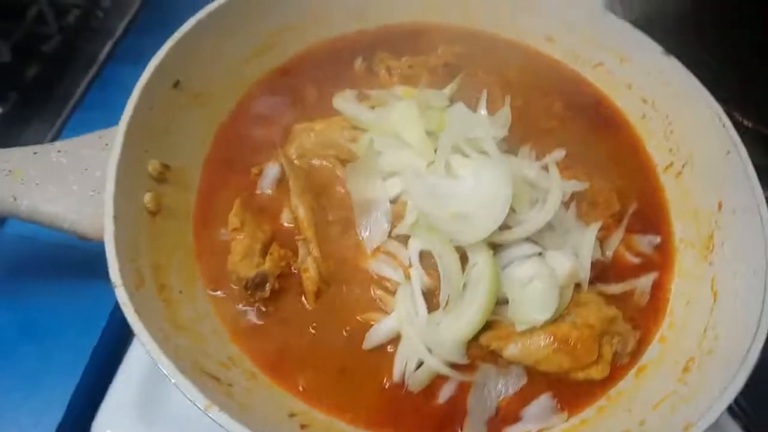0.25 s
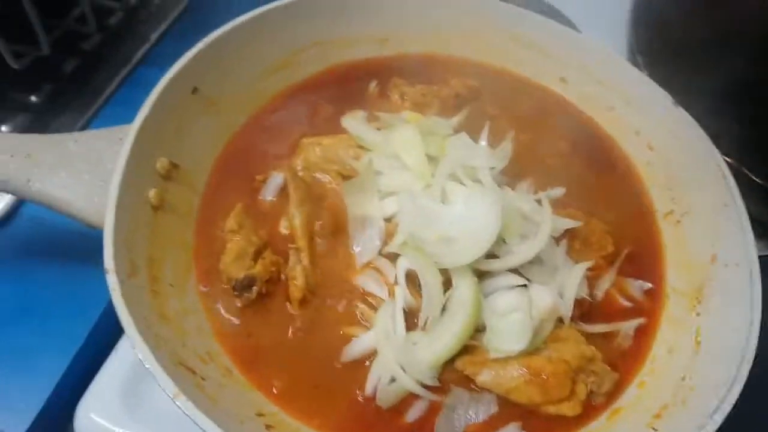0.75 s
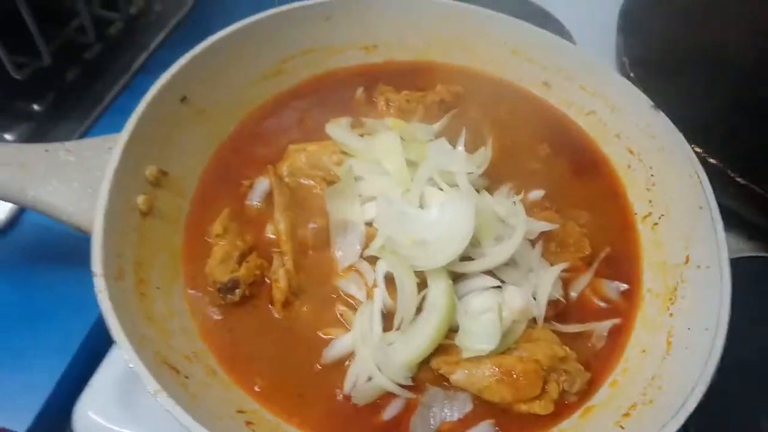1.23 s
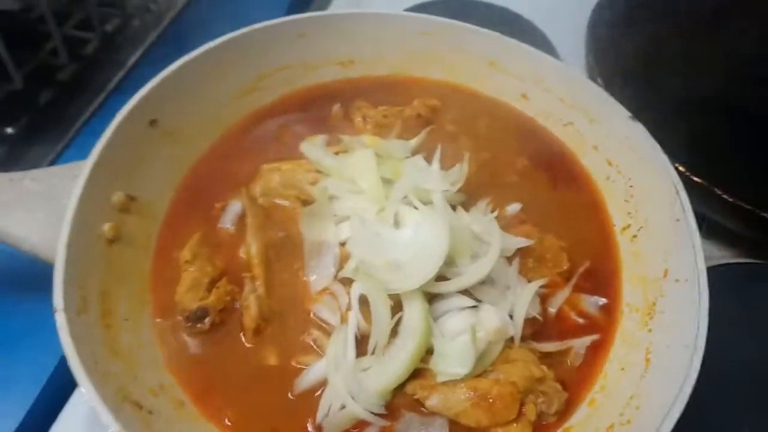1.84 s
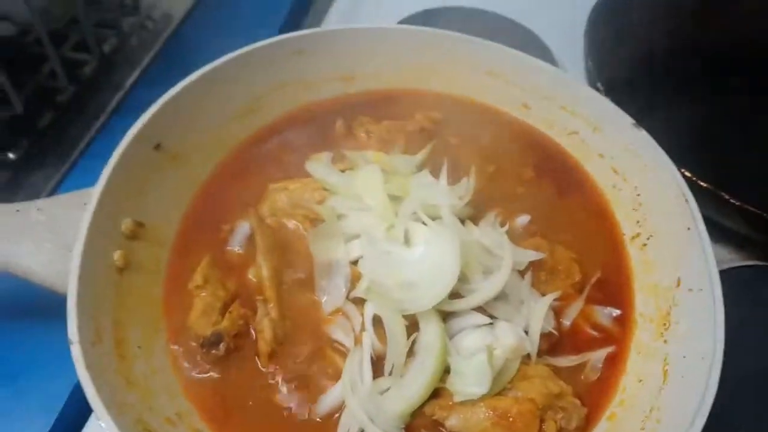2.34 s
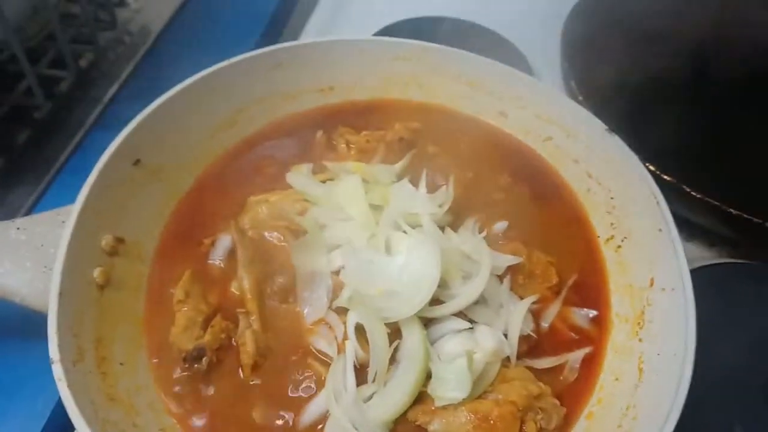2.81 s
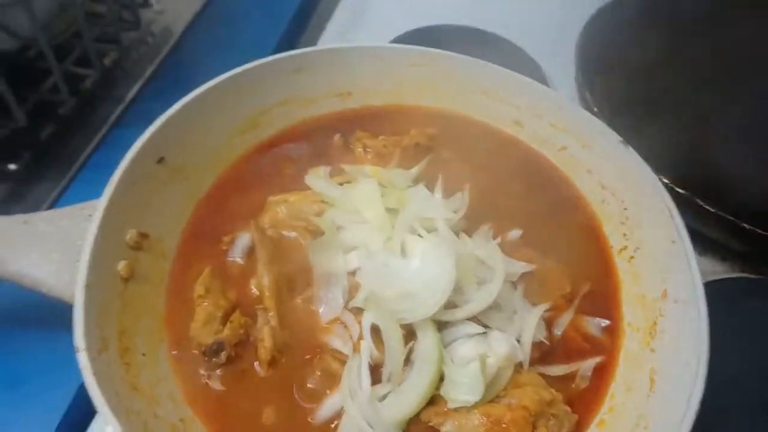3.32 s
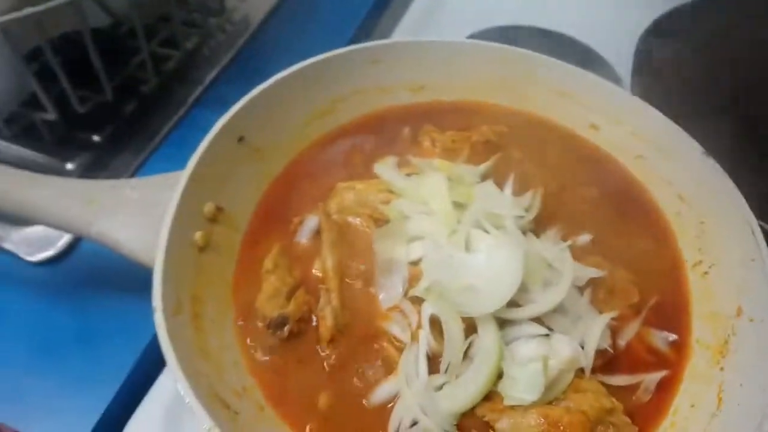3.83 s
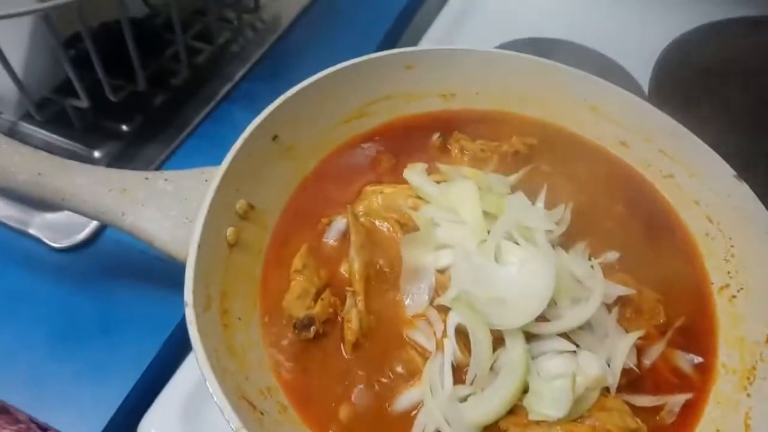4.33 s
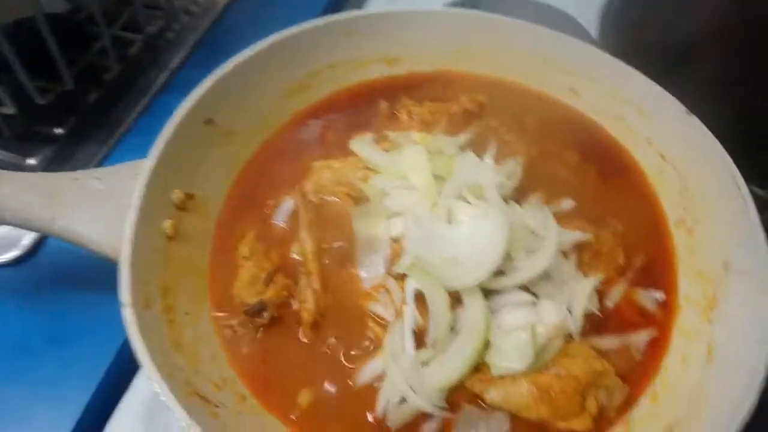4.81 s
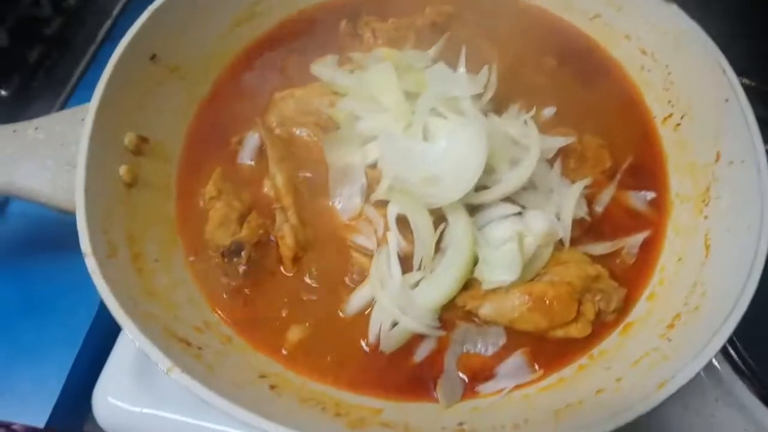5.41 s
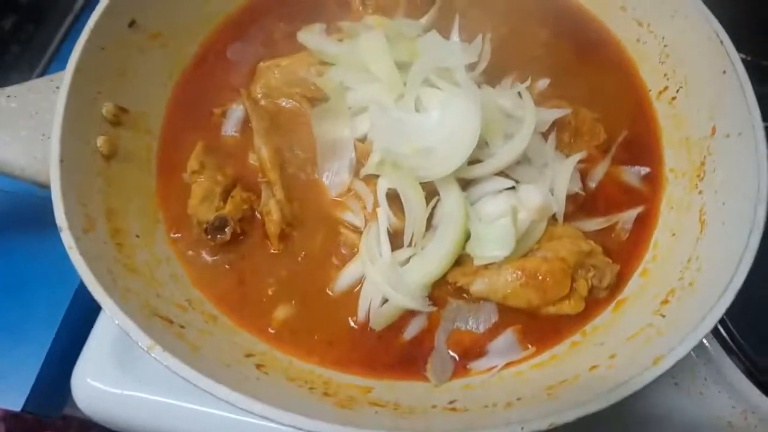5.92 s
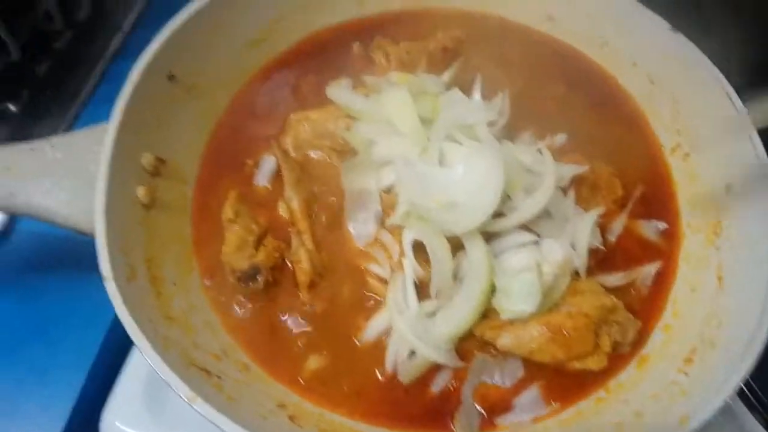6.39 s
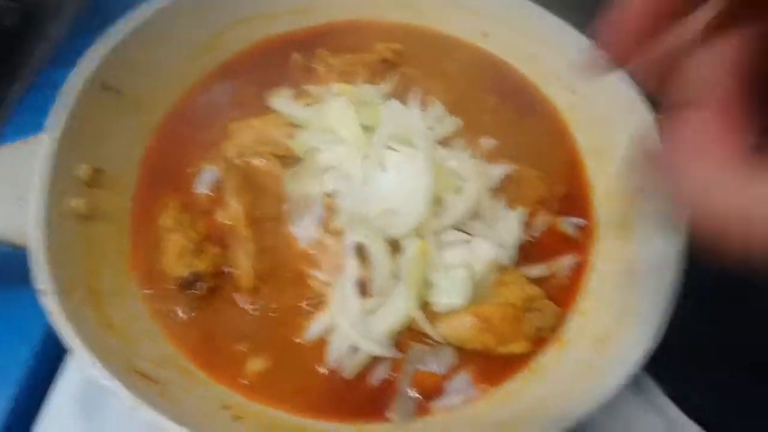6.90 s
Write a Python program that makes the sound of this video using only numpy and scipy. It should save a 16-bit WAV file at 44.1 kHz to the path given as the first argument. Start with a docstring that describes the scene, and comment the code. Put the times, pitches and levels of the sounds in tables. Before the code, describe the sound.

Throughout about seven seconds, thick sauce simmers in a pan close to the microphone. Tiny bubbles tick and fizz; larger ones pop and plop with short, upward-bending tones and quick echoes from the pan wall. Beside the stove, a soft set-down comes at 0.1, a faint china clink at 0.6 and a clearer one at 0.93. From 1.25 a drawer whirrs on its rollers, hits its stop at 1.33 and rattles in shrinking knocks until 1.62, with another light clink near 1.59. A dish gives a brief, rough low scrape at 2.3, then the drawer shifts faintly at 2.5. Soft thuds and a bright china clink fall around 3.1. At 3.6 the drawer bumps firmly and rolls until about 4.05. Bubbling then dominates, with strong pops near 5.0 and the loudest at 6.4. Low room rumble and thin hiss lie underneath.

```python
"""Curry simmering in a home kitchen

Close to the microphone, bubbles burst on thick sauce in a pan: short tones that rise in pitch, small ones
ticking and fizzing, large ones plopping. Further off beside the stove a china dish is clinked and nudged on
the worktop, its ring a sum of dying modes. A drawer of whirring noise bands runs on its rollers, bumps and
rattles to rest, and later rolls again. Faint narrow-band tones come from lightly tapped china and the ringing
drawer, and the room rumbles under a thin hiss."""
import sys
import numpy as np
from scipy import signal
from scipy.fft import rfft, irfft, next_fast_len
from scipy.io import wavfile

SR = 44100
rng = np.random.default_rng(int(sys.argv[2]) if len(sys.argv) > 2 else 0)


def materialize(psi):
    """Save the field psi as 16-bit PCM at rate SR to the path in sys.argv[1].

    A 1-D psi becomes a single channel; in a 2-D psi each row is a channel.
    """
    bounded = np.clip(np.atleast_2d(psi).T, -1, 1)
    quanta = np.round(bounded * 32767).astype(np.int16)
    wavfile.write(sys.argv[1], SR, quanta)


N = 315315
TIME = np.arange(N) / SR   # seconds


def from_db(db):
    """Decibels to gain."""
    return 10 ** (np.asarray(db) / 20)


def rms_one(x):
    """Scale to rms 1."""
    return x / np.sqrt(np.mean(x ** 2) + 1e-20)


def add(out, s, sound):
    """Mix a sound in at time s."""
    start = max(0, round(s * SR))
    out[start:start + len(sound)] += sound[:max(0, N - start)]


def filtered(x, hz, kind, order=2):
    """Butterworth filter."""
    edges = np.clip(hz, 10, .45 * SR)
    sos = signal.butter(order, edges, kind, fs=SR, output="sos")
    return signal.sosfilt(sos, x + 1e-18)


def noise_band(count, centre_hz, width_hz):
    """Narrow band of noise; rms 1."""
    edges = [centre_hz - width_hz / 2, centre_hz + width_hz / 2]
    return rms_one(filtered(rng.standard_normal(count), edges, "band"))


def coloured(x, spectrum):
    """Give a steady signal a spectrum; rms 1."""
    hz, db = np.transpose(spectrum)
    size = next_fast_len(len(x))
    bins = np.maximum(np.fft.rfftfreq(size, 1 / SR), 1)
    gain = from_db(np.interp(np.log(bins), np.log(hz), db))
    return rms_one(irfft(rfft(x, size) * gain, size)[:len(x)])


def wander(hz):
    """Random drift up to a given rate; spread 1."""
    return rms_one(filtered(rng.standard_normal(N), hz, "low"))


def dying(t, t60):
    """Envelope that falls 60 dB in t60."""
    return np.exp(-np.log(1000) * t / np.maximum(t60, 1e-4))


def swelling(t, rise_s):
    """Envelope of a blow spreading through a body."""
    return 1 - np.exp(-(t / rise_s) ** 2)


def reflections(x, t60, gap_s, low_hz, high_hz):
    """Diffuse echoes: a dying noise tail of unit energy that begins after a short gap."""
    t = TIME[:SR * 3 // 4]
    tail = filtered(rng.standard_normal(len(t)), [low_hz, high_hz], "band", order=1)
    tail = tail * dying(t, t60) * (t > gap_s)
    return signal.fftconvolve(x, tail / np.sqrt(np.sum(tail ** 2)))[:N]


# The kitchen's steady tone. Each row: frequency in Hz, relative density in dB per Hz.
ROOM_SPECTRUM = [(20, -5.5), (42, -11.5), (68, 7), (92, -3.5), (122, 8.5), (180, -34), (310, 1), (440, -15),
                 (770, -3), (1050, -14.5), (2500, -21.5), (6300, -28.5), (9000, -48), (14000, -51)]
ROOM_TONE_DB, HIGH_HISS_DB = -59, -81.5   # rms


def background():
    """Low room noise and a thin, very high hiss."""
    room = from_db(ROOM_TONE_DB) * coloured(rng.standard_normal(N), ROOM_SPECTRUM)
    hiss = filtered(rng.standard_normal(N), [14900, 15900], "band")
    return room + from_db(HIGH_HISS_DB) * rms_one(hiss)


# Bubbles too small to hear singly, close over the pan. Each row: frequency in Hz, relative density in dB per Hz.
SIZZLE_SPECTRUM = [(1200, -35), (2500, -10.5), (4500, 1.5), (6500, -3), (9000, -22), (14000, -22.5)]
SIZZLE_DB, SIZZLE_FLICKER_DB, SIZZLE_FLICKER_HZ = -74, 3, 8.9


def sizzle():
    """The finest fizz is noise that comes and goes in small surges."""
    level = from_db(SIZZLE_DB + SIZZLE_FLICKER_DB * wander(SIZZLE_FLICKER_HZ))
    return level * coloured(rng.standard_normal(N), SIZZLE_SPECTRUM)


def burst(hz, cycles, rise, opening=2.33):
    """A bubble's cavity rings a few cycles, rising in pitch as its film opens; peak 1."""
    t60 = cycles / hz
    t = TIME[:int(1.5 * t60 * SR) + 2]
    turns = hz * t * (1 + rise * (t / t60 - .5))
    onset = (1 - np.exp(-(opening * hz * t) ** 2)) ** 2
    wave = np.sin(2 * np.pi * turns) * dying(t, t60) * onset
    return wave / np.max(np.abs(wave))


def wall_echo(wave, nearest_s=0.000905, farthest_s=0.00325, echo_db=-11):
    """The pan's wall returns a burst after a random lag that stands for the bubble's place."""
    lag = int(SR * (nearest_s + abs(farthest_s - nearest_s) * rng.random() ** 2))
    return np.pad(wave, (0, lag)) + from_db(echo_db) * np.pad(wave, (lag, 0))


# The loudest bubbles in the pan, close to the microphone.
# Each row: start in seconds, peak level in dB before echoes, nominal pitch in Hz, cycles of ring in a 60 dB
# fall, after-ring in dB relative to the peak before after_db is added.
LOUD_BUBBLES = [(0.0048, -34.5, 760, 7.6, -20), (0.0148, -40, 800, 8.8, -24), (0.052, -38, 6880, 22, -37.5),
                (0.1526, -34, 2060, 3, -26), (0.1633, -32.5, 2500, 5.6, -21), (0.2021, -38.5, 775, 22, -28),
                (0.2787, -43, 6600, 32, -26), (0.33, -46, 9450, 21, -26), (0.398, -34.5, 1330, 10, -27),
                (0.4055, -41, 1450, 20, -32), (0.4828, -36, 1660, 21, -29), (0.5204, -35, 2330, 7.1, -23),
                (0.5626, -42, 4430, 20, -23), (0.6744, -41.5, 770, 13, -28),
                (0.6917, -38.5, 1530, 8.6, -28), (0.7218, -36, 2140, 15, -33), (1.2108, -36, 1680, 10, -33),
                (1.2344, -42.5, 805, 19, -13), (1.7178, -30.5, 1790, 4.9, -33),
                (1.727, -40.5, 905, 19, -41), (1.738, -44, 1540, 11, -28), (1.7584, -39, 1760, 10, -26),
                (1.7678, -35, 2020, 5.9, -28), (1.7937, -36, 1150, 3.4, -24),
                (1.8411, -30.5, 1676, 5.3, -16), (1.901, -31.5, 880, 1.5, -26),
                (2.0522, -32.5, 1980, 6.6, -24), (2.0873, -41, 1540, 7.4, -31),
                (2.181, -38, 4670, 9.3, -28), (2.422, -36, 2280, 12, -34), (2.4328, -38, 4370, 12, -30),
                (2.5632, -31, 2360, 8.3, -19), (2.629, -37.5, 4500, 15, -25), (2.6966, -33, 1750, 11, -42),
                (2.888, -43.5, 6790, 35, -18), (3.0305, -35.5, 4130, 8.3, -21),
                (3.3105, -36.5, 1650, 8.3, -30), (3.3324, -33, 850, 4.1, -25), (3.3365, -42, 6600, 32, -25),
                (3.411, -34.5, 1120, 8.6, -32), (3.4481, -35.5, 1460, 5.2, -23),
                (3.5106, -36.5, 1960, 13, -23), (3.5275, -36, 2030, 13.4, -36),
                (4.0578, -28.5, 1770, 6.7, -34), (4.1073, -33.5, 1320, 12, -36.5),
                (4.1324, -37.5, 764, 13, -29), (4.271, -40, 2140, 10, -22), (4.2835, -38.5, 2340, 12, -24),
                (4.3096, -35, 1620, 6, -34), (4.3477, -38, 1360, 10, -22), (4.3633, -35.5, 1210, 9.1, -30),
                (4.422, -28, 1690, 8.6, -32), (4.5136, -32, 1173, 8.3, -10), (4.5545, -36.5, 1410, 7, -24),
                (4.7068, -37.5, 730, 10, -23), (4.7463, -31, 1180, 5.5, -30), (4.7527, -41, 1470, 9, -30),
                (4.831, -38.5, 1830, 8, -31), (4.8491, -34, 800, 5.9, -32), (4.912, -50, 7200, 53, -30),
                (4.9755, -33, 1590, 14, -28), (4.9856, -25.5, 2410, 10.5, -13.5),
                (5.101, -33, 2240, 8.8, -24), (5.1043, -30, 1550, 3.6, -24), (5.118, -32.5, 1520, 10, -30),
                (5.211, -38.5, 6400, 12, -19), (5.2748, -33, 1320, 8.4, -21),
                (5.2995, -28.5, 1770, 3.8, -30), (5.3222, -40, 5200, 18, -18),
                (5.4912, -32.5, 4430, 6.5, -28), (5.5048, -38, 4470, 17, -28),
                (5.5234, -30.5, 2160, 7.6, -27), (5.5962, -37, 1840, 9.3, -26),
                (5.6113, -36.5, 1790, 11, -30), (5.6395, -38, 5460, 16, -28), (5.8474, -32, 2900, 24, -19),
                (5.8492, -31, 2900, 13, -34), (5.9405, -38.5, 810, 13, -30), (6.001, -37.5, 4500, 12, -24),
                (6.0575, -33, 1780, 3.8, -34), (6.271, -43, 12500, 2.8, -30), (6.3554, -43, 6800, 36, -32),
                (6.3875, -26.5, 2040, 6.2, -29), (6.4287, -19, 2384, 3.8, -16),
                (6.4348, -31.5, 2345, 69, -18), (6.4596, -35.5, 764, 12, -34),
                (6.522, -40.5, 1560, 7.5, -23), (6.6235, -32.5, 2250, 14, -18),
                (6.6365, -44, 2320, 14, -26), (6.6743, -45, 6650, 37, -30), (6.7514, -33.5, 2320, 10, -36),
                (6.7905, -42, 2250, 14, -30), (6.824, -33, 2070, 11, -39), (6.8472, -39, 740, 16, -17),
                (6.9372, -40, 1690, 6.7, -31), (6.974, -30.5, 1730, 17, -32),
                (7.0861, -36.5, 4260, 18, -20), (7.1043, -39, 826, 19, -27)]


def loud_pops(rise=0.11, top_ratio=2.34, reach_hz=2800, bottom_ratio=0.15, after_db=6, after_t60=0.036):
    """The strongest bubbles burst singly, softened by the thick sauce; the open cavity rings on faintly."""
    out = np.zeros(N)
    for s, db, hz, cycles, ring_on_db in LOUD_BUBBLES:
        top_hz = min(top_ratio * hz, hz + reach_hz)
        wave = filtered(burst(hz, cycles, rise), top_hz, "low", order=5)
        wave = filtered(wave, bottom_ratio * hz, "high", order=1)
        add(out, s, from_db(db) * wall_echo(wave / np.max(np.abs(wave))))
        after = burst(hz, after_t60 * hz, rise)
        after = after * swelling(TIME[:len(after)], rise_s=0.004)
        add(out, s, from_db(db + ring_on_db + after_db) * after)
    return out


# weaker neighbours of a loud burst: earliest lead, mean delay, highest relative level and range below it
NEIGHBOUR_LEAD_S, NEIGHBOUR_LAG_S, NEIGHBOUR_DB, NEIGHBOUR_SCATTER_DB = 0.00301, .02, -18, 15
NEIGHBOUR_HZ, NEIGHBOUR_OCTAVES = 1400, 1.45   # centre of their pitch, and spread to either side


def neighbours(cycles=12, rise=0.17, top_ratio=1.37, count=3):
    """Bubbles beside a loud burst give way with it, a few just before, most a moment later."""
    out = np.zeros(N)
    all_draws = rng.random((len(LOUD_BUBBLES), count, 3))
    for (s, db, *_), draws in zip(LOUD_BUBBLES, all_draws):
        for lag, size, pitch in draws:
            hz = NEIGHBOUR_HZ * 2 ** (NEIGHBOUR_OCTAVES * (2 * pitch - 1))
            wave = filtered(burst(hz, cycles, rise), top_ratio * hz, "low", order=4)
            start = s - NEIGHBOUR_LEAD_S - NEIGHBOUR_LAG_S * np.log(1 - lag)
            level_db = db + NEIGHBOUR_DB - NEIGHBOUR_SCATTER_DB * size
            add(out, start, from_db(level_db) * wave)
    return out


# The simmer across the pan, by bubble size. Each row: centre pitch in Hz, bursts per second, strongest peak
# in dB before filters and SIMMER_DB, range of peaks below it in dB, cycles of ring in a 60 dB fall.
BUBBLE_SIZES = [(172.5, 24, -49.5, 7, 7.5), (271, 41, -43.5, 18, 4.4), (487, 42, -46.5, 12.5, 6),
                (776, 38, -40, 13.5, 9.4), (1213, 70, -42.5, 20, 11), (1674, 56, -41.5, 17.5, 9.9),
                (2405, 78, -45, 13, 13.3), (3300, 43, -41, 25, 13), (4745, 54, -43.5, 16.5, 36),
                (6810, 36, -41.5, 18, 21), (8600, 12, -47.5, 10.5, 10)]
SIMMER_DB = 2   # the heat is steady


def simmer(pitch_spread=0.11, rise=0.3, bunch_s=.018, top_ratio=1.336, bottom_ratio=0.46):
    """Bubbles of every size burst in loose bunches; the weaker they are, the more there are."""
    out = np.zeros(N)
    bunches = (np.arange(160) + 3 * rng.random(160) - 1) % 160 * N / SR / 160   # seconds
    for centre_hz, per_s, top_db, range_db, cycles in BUBBLE_SIZES:
        alike = np.zeros(N)
        draws = rng.random((1200, 5))
        for bunch, lag, pitch, sign, size in draws[:int(per_s * N / SR)]:
            s = bunches[int(bunch * len(bunches))] - bunch_s * np.log(1 - lag)
            wave = burst(centre_hz * np.exp(pitch_spread * (2 * pitch - 1)), cycles, rise)
            level = from_db(top_db - range_db * np.sqrt(size))
            add(alike, s, np.sign(sign - .5) * level * wave)
        alike = filtered(alike, bottom_ratio * centre_hz, "high")   # a cavity radiates little below its pitch
        out += filtered(alike, top_ratio * centre_hz, "low", order=5)   # the sauce softens each onset
    return out * from_db(SIMMER_DB)


def struck(modes, mode_db):
    """Ring of one blow; bending waves are dispersive, so a mode's phase grows with the root of its pitch."""
    hz, db, t60 = np.transpose(modes)[:, :, None]
    t = TIME[:SR * 3 // 4]
    gain = from_db(db[:, 0] + mode_db + rng.standard_normal(len(hz)))   # no two blows are quite alike
    ring = np.sin(2 * np.pi * hz * t - 2 * np.sqrt(hz)) * dying(t, t60)
    return gain @ ring * swelling(t, rise_s=0.0028)


# The worktop beside the stove. Each row: mode in Hz, relative level in dB, free t60 in seconds.
WORKTOP_MODES = [(162, -6.5, 0.16), (317.6, -0.5, 0.13), (384.6, -6, 0.59), (449, -4, 0.35)]
# Soft set-downs on it, a little way off. Each row: start in seconds, level in dB.
SET_DOWNS = [(0.111, -38.5), (3.093, -29), (3.154, -28)]


def set_downs():
    """A soft touch thuds in the worktop's modes, and the hand damps it."""
    out = np.zeros(N)
    for s, db in SET_DOWNS:
        ring = struck(WORKTOP_MODES, db)
        add(out, s, ring * dying(TIME[:len(ring)], t60=0.057))
    return out


# Contact noise of a hard blow, before its tilt. Each row: frequency in Hz, relative density in dB per Hz.
CRACK_SPECTRUM = [(40, -35), (100, -64), (400, 0.5), (1200, 9.5), (2500, 3), (5000, -0.5), (6800, -4),
                  (8200, -21.5), (13500, -36.5), (15500, -27)]


def crack(t60, tilt_db):
    """Short burst of contact noise; its tilt in dB per octave above 1 kHz is set: a lower tilt is duller."""
    t = TIME[:SR // 4]
    spectrum = [(hz, db + tilt_db * max(0, np.log2(hz / 1000))) for hz, db in CRACK_SPECTRUM]
    noise = coloured(rng.standard_normal(len(t)), spectrum)
    return noise * dying(t, t60) * swelling(t, rise_s=0.00043)


# The china dish. Each row: mode in Hz, relative level in dB knocked on the wall, the same knocked on the rim,
# free t60 in seconds.
CHINA_MODES = [(825, -10, -10, 0.12), (915, -11.5, -5, 0.15), (1268, -21, -16, 0.11), (1704, 1, -15, 0.044),
               (1785, -13, -8, 0.37), (1867, -7, -21, 0.091), (2240, -5, -8, 0.087), (2625, -20, -9, 0.14),
               (2752, -27, 7, 0.24), (2766, -5, -12, 0.28), (3300, -20, -13.5, 0.21),
               (3480, -36, -27, 0.21), (3830, -6, -27, 0.083), (3980, -13, -21, 0.089),
               (3968, -4, 3.5, 0.097), (4020, -24, -14, 0.48), (4065, -9, -5, 0.11), (4300, -12, -7, 0.089),
               (4690, -20, -5.5, 0.093), (4900, -18, -10, 0.11), (5085, -10, -16, 0.12),
               (5150, -21, -20, 0.12), (5430, -21, -11, 0.098), (5450, -40, 18, 0.035),
               (5463, 3, -16, 0.093), (5470, -25, -20.5, 0.6), (5400, -42, -16, 0.094),
               (5580, -29, -2, 0.058), (6200, -37, -7, 0.077), (6630, -47, 3.5, 0.15),
               (7060, -13, -43, 0.11), (7490, -52, -12, 0.29)]
# Its clinks, beside the stove. Each row: start in seconds, level in dB, tilt in dB per octave about 3500 Hz,
# thud in the worktop in dB, place of the knock from 0 wall to 1 rim, share of the free ring time.
CHINA_CLINKS = [(0.594, -43, 6, -45, 0.45, 0.96), (0.934, -27.5, 1.5, -41, 0, 0.88),
                (1.165, -52, 6, -54, 0, 0.54), (1.588, -43.5, 7, -42.5, 0.36, 0.78),
                (3.148, -27.5, 3, -41.5, 0.78, 0.86)]


def clinks(crack_db=-7.0, crack_t60=0.2, crack_tilt_db=3.0, twin_db=-9, twin_share=0.0016):
    """China rings when knocked, in a blend that depends on the place; the worktop thuds under it."""
    out = np.zeros(N)
    hz, wall_db, rim_db, t60 = np.transpose(CHINA_MODES)
    for s, db, tilt_db, thud_db, place, ring_share in CHINA_CLINKS:
        blend_db = wall_db + np.clip(place, 0, 1) * (rim_db - wall_db)
        modes = np.transpose([hz, blend_db, ring_share * t60])
        mode_db = db + tilt_db * np.log2(hz / 3500)
        add(out, s, struck(modes, mode_db))
        # not quite round: each mode beats with a twin
        add(out, s, struck(modes * [1 + twin_share, 1, 1], mode_db + twin_db))
        add(out, s, from_db(db + crack_db) * crack(crack_t60, crack_tilt_db))
        add(out, s, struck(WORKTOP_MODES, thud_db))
    return out


# Faint narrow-band tones beside the stove: lightly tapped china and the ringing drawer.
# Each row: start in seconds, length in seconds, pitch in Hz, level in dB.
FAINT_TONES = [(1.102, 0.11, 4410, -60.5), (1.161, 0.026, 4450, -51.5), (1.252, 0.072, 1885, -39),
               (2.183, 0.2, 4910, -68), (3.599, 0.03, 830, -38.5), (3.603, 0.02, 6500, -41.5),
               (4.493, 0.033, 3330, -57), (4.518, 0.022, 4700, -61), (4.525, 0.025, 3960, -56),
               (4.527, 0.016, 5420, -58)]


def faint_tones(width_hz=55):
    """Each faint tone is a narrow band of noise that swells and fades."""
    out = np.zeros(N)
    for s, length, hz, db in FAINT_TONES:
        tone = noise_band(SR, hz, width_hz)
        swell = np.sqrt(np.hanning(int(length * SR)))
        add(out, s, from_db(db) * swell * tone[-len(swell):])
    return out


# Pushes on the drawer. Each row: start in seconds, attack, hold and release lengths in seconds, slowing in dB
# per second, then before the layer gains: roller level in dB, rail and rumble in dB relative to it.
DRAWER_PUSHES = [(1.249, 0.02, 0.035, 0.038, 448, -45, 10.5, -0.5),
                 (1.325, 0.018, 0.055, .33, 208, -45.5, 3.5, 10.5),
                 (2.459, 0.071, 0.016, 0.11, 236, -48, -1.5, -6.5),
                 (3.592, 0.026, 0.0032, 0.067, 260, -42, 7, -2.5),
                 (3.633, 0.15, 0.041, 0.225, 71, -30, -1.5, -12)]
# Roller pitch along the runs. Each row: time in seconds, pitch in Hz before slip.
ROLLER_PITCH = [(1.25, 855), (1.32, 873), (1.34, 1036), (1.5, 901), (2.47, 982), (2.54, 1061),
                (2.65, 922.6), (3.6, 841.5), (3.635, 858.7), (3.645, 1096), (3.69, 1065), (3.79, 1130),
                (3.83, 1029), (3.87, 951), (3.92, 1006), (3.96, 1021), (4.04, 890)]
SPEED_UP_POWER = 0.57   # speed grows with this power of the time pushed
BRAKE_S = 0.022   # the last stretch before a stop
TREBLE_POWER, RUMBLE_POWER = 1.3, 0.34   # rail hiss and box rumble go with these powers of the speed


def drawer_motion():
    """Each push speeds up, holds, coasts and brakes; gives gains of rollers, rails and box, and a set pitch."""
    rolling, hissing, rumbling = np.zeros((3, N))
    for start, attack, hold, release, slowing, db, treble_db, low_db in DRAWER_PUSHES:
        t = TIME - start
        gained = np.clip(t / attack, 0, 1) ** SPEED_UP_POWER
        coasted = np.maximum(t - attack - hold, 0)
        braking = np.clip((release - coasted) / BRAKE_S, 0, 1)
        speed = gained * from_db(-slowing * coasted) * braking
        rolling += from_db(db) * speed
        hissing += from_db(db + treble_db) * speed ** TREBLE_POWER
        rumbling += from_db(db + low_db) * speed ** RUMBLE_POWER
    return rolling, hissing, rumbling, np.interp(TIME, *np.transpose(ROLLER_PITCH))


# The rollers' whirr. Each row: multiple of roller pitch, width in Hz, relative level in dB.
ROLLER_BANDS = [(1, 31.8, 3), (1.33, 40, -1), (1.47, 40, -11.5), (1.62, 39.8, -8), (1.86, 129, -1.5),
                (2.05, 90, -5), (2.35, 60, -9), (2.7, 120, -6), (5.35, 200, -10)]
# Rings of the rails at fixed pitches. Each row: pitch in Hz, width in Hz, relative level in dB.
RAIL_RING_BANDS = [(1430, 100, 1.5), (1920, 53, -5), (2253, 77, 0), (2594, 140, -2.5), (2933, 57, -5.5),
                   (3390, 41, -3.5), (3946, 100, -2), (4260, 95, -3), (4820, 38, -3.5), (5800, 160, -3),
                   (6420, 250, -4.5), (7030, 90, -12)]
# Hiss of the rails. Each row: frequency in Hz, relative density in dB per Hz.
RAIL_SPECTRUM = [(700, -10), (1410, -5), (2400, -10), (2880, -6), (3160, -3), (3310, 1), (4790, 1),
                 (5170, -1), (5840, -4), (7240, -8.5), (8500, -21.5), (11400, -28.5), (13700, -39),
                 (15000, -28)]
# Rumble of the box. Each row: frequency in Hz, relative density in dB per Hz.
RUMBLE_SPECTRUM = [(40, -52), (80, -23), (128, 4), (200, -1), (400, -0.5), (650, -3.5), (900, -9),
                   (1500, -50), (3000, -99)]


def drawer_runs(rail_db=-8, rings_db=-5, roller_db=-1.5, rumble_db=-3, grain_db=1.95,
                flutter_db=1.0, flutter_hz=45, slip_share=0.00695):
    """Rollers whirr along a moving pitch, each slipping a little; the rails hiss and ring, the box rumbles."""
    rolling, hissing, rumbling, roller_hz = drawer_motion()
    whirr, rings = np.zeros((2, N))
    for multiple, width_hz, level_db in ROLLER_BANDS:
        band_hz = multiple * roller_hz * (1 + slip_share * wander(hz=25.8))
        phase = 2 * np.pi * np.cumsum(band_hz) / SR
        band = wander(width_hz / 2) * np.cos(phase) + wander(width_hz / 2) * np.sin(phase)
        whirr += from_db(level_db) * rms_one(band)
    whirr = from_db(roller_db) * rolling * rms_one(whirr)
    for ring_hz, width_hz, level_db in RAIL_RING_BANDS:
        rings += from_db(level_db) * noise_band(N, ring_hz, width_hz)
    hiss = from_db(rail_db) * coloured(rng.standard_normal(N), RAIL_SPECTRUM)
    rail = hissing * (hiss + from_db(rings_db) * rms_one(rings))
    grain = from_db(grain_db * wander(hz=280) + flutter_db * wander(flutter_hz))   # the level flickers
    rumble = from_db(rumble_db) * rumbling * coloured(rng.standard_normal(N), RUMBLE_SPECTRUM)
    return grain * (whirr + rail) + rumble


# Drawer front and rails. Each row: mode in Hz, relative level in dB, t60 in seconds.
DRAWER_MODES = [(68.2, -21, 0.99), (128.8, 7, 0.18), (181, -3, 0.07), (246.4, -1.5, 0.15),
                (302.3, -6, 0.22), (350, -10, 0.21), (399, -9.5, 0.33), (525, 0, 0.076), (678, -10.5, 0.04),
                (985, -12, 0.045), (1097, -2, 0.07), (1124, -12, 0.11), (1310, -27, 0.09), (1377, 3, 0.037),
                (1534, -7, 0.089), (1920, 2, 0.049), (2230, 8.5, 0.039), (2624, -2, 0.065),
                (2910, -6.5, 0.1), (3850, 1, 0.041), (4290, 7, 0.029), (5020, 3, 0.031), (7250, -9, 0.032)]
# The drawer's bumps, beside the stove. Each row: start in seconds, level in dB, tilt in dB per octave above
# 1 kHz, boom of the box in dB, knock of the front in dB, contact noise in dB relative to the level, its t60 in
# seconds. Ring levels, boom and knock are before ring_db.
BUMP_BLOWS = [(1.331, -31.5, -28, -42, -45, 3.5, 0.05), (1.3321, -22, 0.5, -28.5, -25, 1, 0.056),
              (1.372, -31.5, -4, -52, -37, 4.5, 0.06), (1.4211, -21.5, -7.5, -29.5, -40, -3, 0.04),
              (1.45, -31.5, -7, -45, -36, 4, 0.035), (1.4984, -24.5, -11.5, -39, -32.5, -7, 0.027),
              (1.524, -32.5, -11, -38, -47, 3, 0.025), (1.565, -28, -12.5, -39, -44, -6, 0.025),
              (1.582, -41, -7, -53, -40.5, -7, 0.036), (1.618, -33, -17, -44, -42, -11, 0.024),
              (3.6443, -15, -14.5, -29.5, -29, -11.5, 0.069)]


def drawer_bumps(ring_db=-4):
    """The drawer meets its stop and rebounds: each blow rings its modes under a burst of contact noise."""
    out = np.zeros(N)
    hz = np.array(DRAWER_MODES)[:, 0]
    for s, db, tilt_db, boom_db, knock_db, crack_db, crack_t60 in BUMP_BLOWS:
        upper_db = db + tilt_db * np.maximum(0, np.log2(hz / 1000))
        mode_db = np.select([hz < 200, hz < 600], [boom_db, knock_db], upper_db)
        add(out, s, struck(DRAWER_MODES, mode_db + ring_db))
        add(out, s, from_db(db + crack_db) * crack(crack_t60, tilt_db))
    return out


# one push of the dish along the worktop: time of its peak, level there, centre pitch
NUDGE_S, NUDGE_DB, NUDGE_HZ = 2.31, -41, 382
NUDGE_RISE_DB_PER_S, NUDGE_FALL_DB_PER_S = 214, 174


def nudge(rough=0.45, overtone_db=-24, wobble_share=0.0613):
    """The dish's foot sticks and slips near a worktop resonance: a rough, wobbling tone and its octave."""
    wobble, shake = wander(hz=57), wander(hz=57)
    phase = 2 * np.pi * np.cumsum(NUDGE_HZ * (1 + wobble_share * wobble)) / SR
    t = TIME - NUDGE_S
    level = from_db(NUDGE_DB + np.minimum(NUDGE_RISE_DB_PER_S * t, -NUDGE_FALL_DB_PER_S * t))
    tone = rms_one(np.sin(phase) + from_db(overtone_db) * np.sin(2 * phase))
    return level * (1 + rough * shake) * tone


def scene():
    """The pan is close, with quick echoes off its wall; dish and drawer are further off in the room."""
    pan = loud_pops() + neighbours() + simmer()
    pan = pan + from_db(-14.5) * reflections(pan, t60=0.01, gap_s=0.00197, low_hz=830, high_hz=3900)
    pan = pan + from_db(-17.0) * reflections(pan, t60=0.23, gap_s=0.0028, low_hz=151, high_hz=3880)
    aside = set_downs() + clinks() + faint_tones() + drawer_runs() + drawer_bumps() + nudge()
    aside = aside + from_db(-13.0) * reflections(aside, t60=0.4, gap_s=0.02, low_hz=140, high_hz=5800)
    return (background() + sizzle() + pan + aside)[None]


CUTOFF_HZ = 16000


def record(dry):
    """The small microphone loses the deep bass, and the top is cut steeply."""
    thin = filtered(dry, 32, "high", order=3)
    steep = signal.ellip(10, .1, 70, CUTOFF_HZ, fs=SR, output="sos")
    return signal.sosfilt(steep, thin)


dry = scene()
out = record(dry)
materialize(out)
```